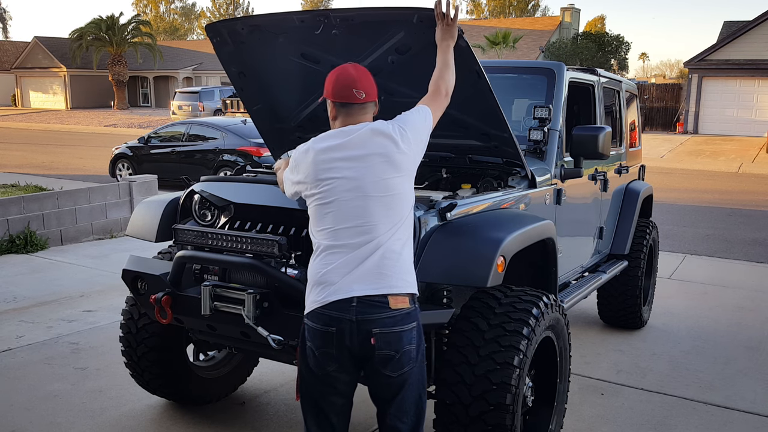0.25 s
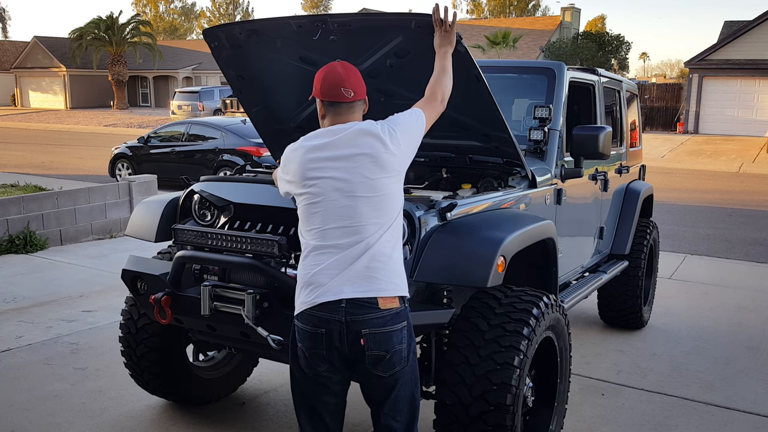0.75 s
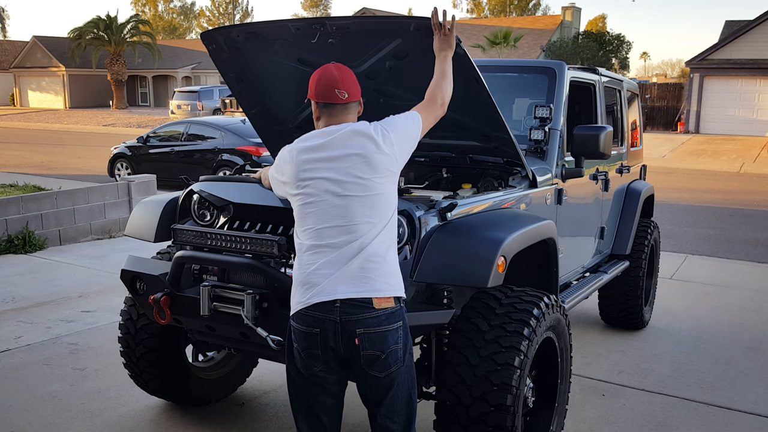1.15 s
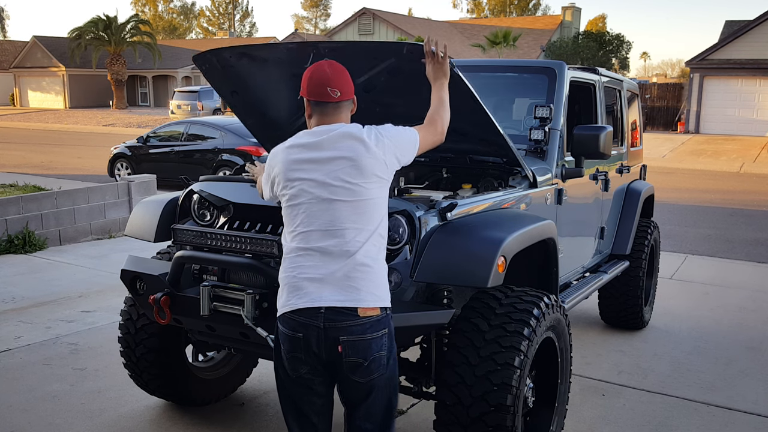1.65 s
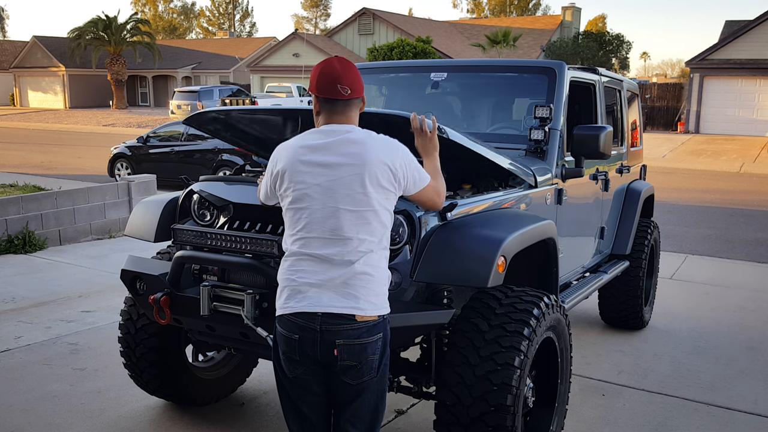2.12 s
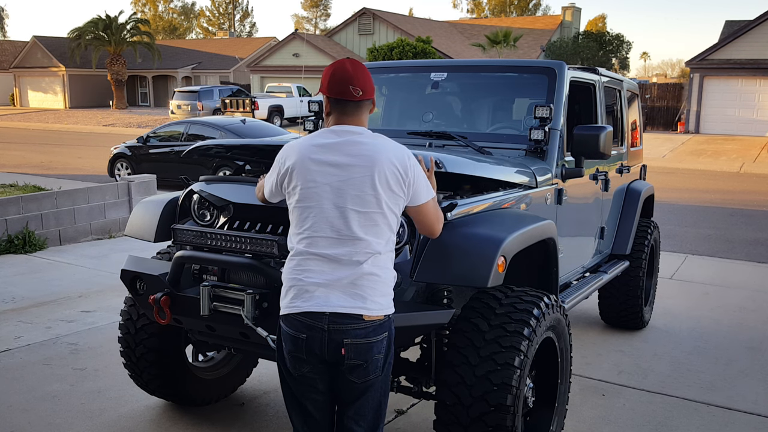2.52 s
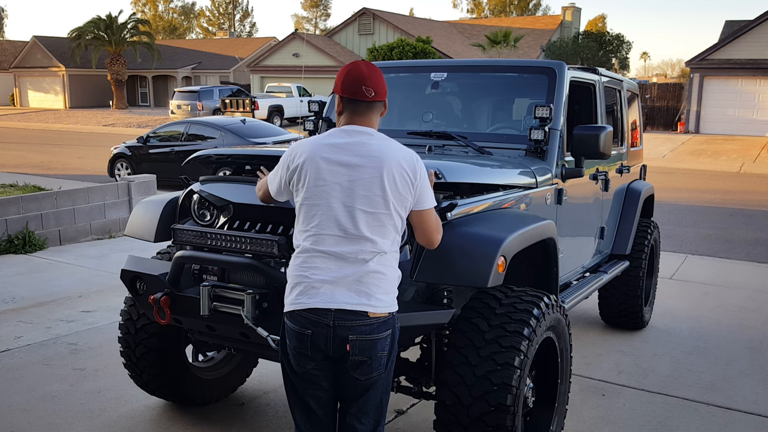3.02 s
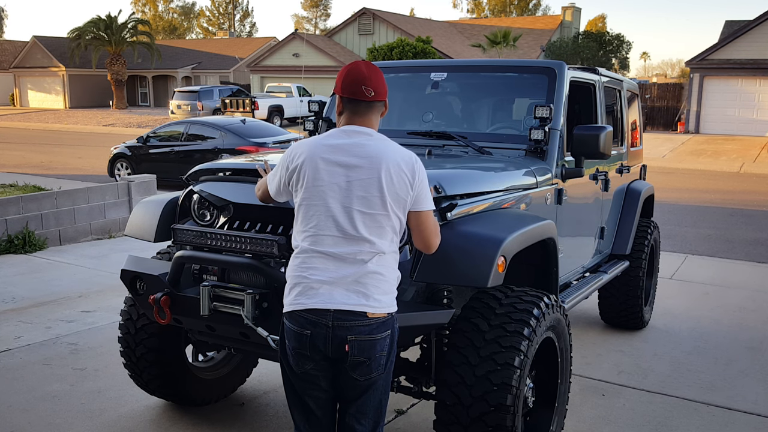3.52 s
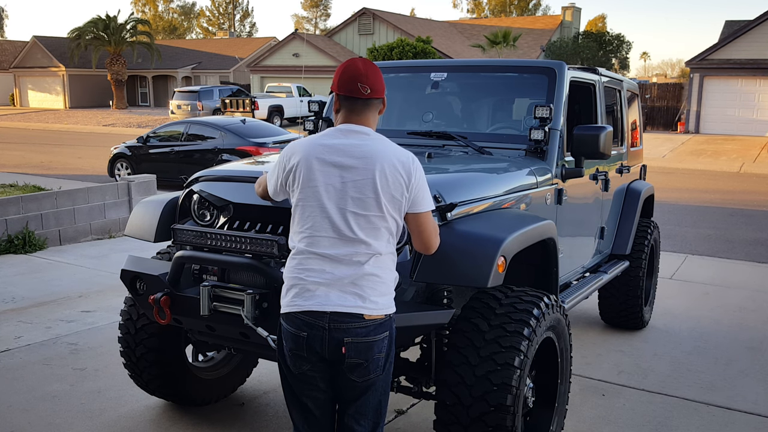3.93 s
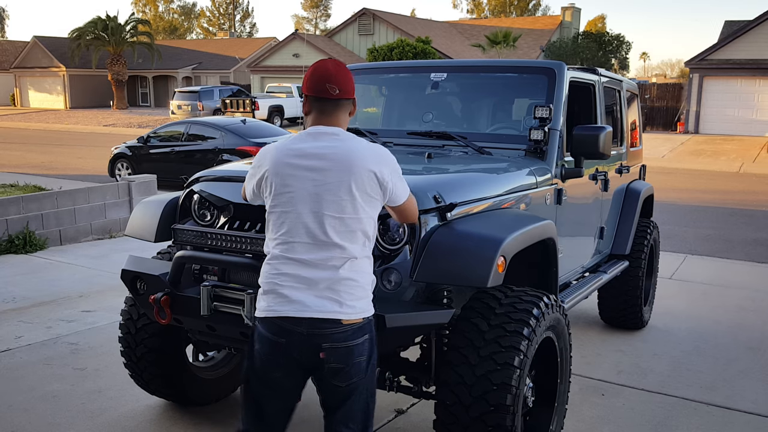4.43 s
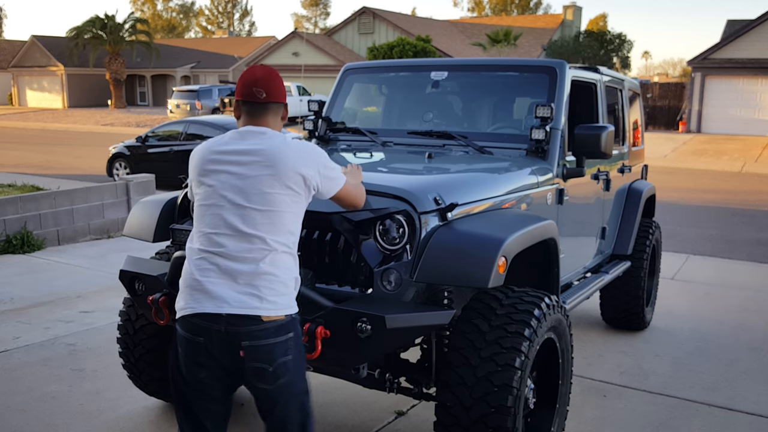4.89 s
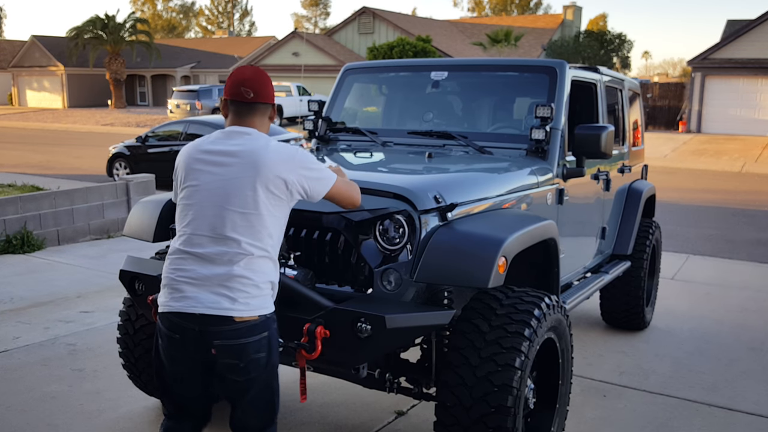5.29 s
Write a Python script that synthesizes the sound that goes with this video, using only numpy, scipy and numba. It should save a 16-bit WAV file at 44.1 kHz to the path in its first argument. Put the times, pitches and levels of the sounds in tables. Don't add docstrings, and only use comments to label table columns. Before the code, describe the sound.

In a driveway a few metres from a phone microphone, hands bump softly on car bodywork, then a prop rod snaps loudly into its holder with a quick rattle. After a quieter pause the steel hood lands with a latch clack and a short hollow boom. Faint knocks, gritty shoe scuffs and a small catch click follow over low distant traffic.

```python
import sys
import numpy as np
from scipy import signal
from scipy.fft import rfft, irfft
from scipy.io import wavfile
from scipy.ndimage import uniform_filter1d
from numba import njit

SR = 44100
rng = np.random.default_rng(int(sys.argv[2]) if len(sys.argv) > 2 else 0)


def elevation(decibels):
    levels = np.asarray(decibels, float)
    return 10 ** (levels / 20)


def log_audio(samples):
    frames = np.atleast_2d(samples).T
    limited = np.clip(frames, -1, 1)
    pcm = np.round(limited * 32767).astype(np.int16)
    wavfile.write(sys.argv[1], SR, pcm)


N = 244843

# start in seconds, strength in dB, contact brightness in Hz,
# chatter length in seconds.
HOOD_BLOWS = [
    (3.575, -56, 700, 0.024),
    (3.623, -42, 930, 0.0098),
    (3.64, -44, 600, 0.0028),
]
LATCH_BLOWS = [
    (3.57, -43.5, 6200, 0.0036),
    (3.573, -39.5, 5000, 0.0017),
    (3.625, -45, 3500, 0.0025),
    (3.636, -51, 2500, 0.0036),
    (3.706, -64, 6000, .012),
]
ROD_BLOWS = [
    (1.369, -57, 6000, 0.002),
    (1.372, -28.5, 4000, .003),
    (1.3755, -31.5, 4000, 0.0042),
    (1.3825, -34.5, 1980, 0.0017),
]
CATCH_BLOWS = [
    (5.091, -52.5, 2500, 0.0023),
    (5.128, -61.5, 7000, 0.022),
]
# frequency in Hz, level in dB, t60 in seconds.
HOOD_MODES = [(51.7, -25, .6), (112, -14.5, 0.47), (154, -9.5, 0.26), (218, -2.5, 0.17), (265.8, -1, 0.28),
              (359, -6.5, 0.16), (440.1, 1.5, 0.25), (573, 7.5, 0.038), (654, -6, 0.079), (868, 2, 0.057),
              (1003, -7.5, 0.095)]
LATCH_MODES = [(295, -5.5, 0.3), (554, 5, 0.15), (708, -5.5, 0.11), (1180, -8, 0.059), (1297, -4, 0.06),
               (1920, -6, 0.057), (2080, -0.5, 0.025), (3090, -6.5, 0.035), (4230, -14.5, .05),
               (5380, -6.5, 0.049)]
ROD_MODES = [(155.8, 2.5, 0.13), (267.7, -4.5, 0.12), (359, -1, 0.083), (450.4, -2, 0.12), (563, -4, 0.036),
             (648, -4.5, 0.039), (1010, -3.5, 0.056), (1336, -15, .1), (1446, -11.5, 0.055),
             (1545, 2.5, 0.035), (1860, -3, 0.086), (1838, -7, 0.086), (2147, 1, .06), (2330, -13, 0.091),
             (2380, -25, .08), (3000, -5.5, 0.047), (4640, -11.5, 0.035), (8000, -13, 0.052)]
CATCH_MODES = [(267, 1.5, 0.035), (827, -14, 0.077), (1097, -2.5, 0.072), (1262, -2, 0.11),
               (1550, 3.5, 0.024), (1864, -8, 0.072), (2140, -14, .08)]
# frequency in Hz, density in dB per Hz.
HOOD_SHEET = [(30, -24), (60, -18.5), (110, -19), (200, -19), (330, 0.5), (600, -4), (1000, -15.5),
              (2000, -15.5), (4000, -18.5), (16000, -47)]
LATCH_SHEET = [(100, -24), (300, -19), (650, 0.5), (950, -12), (1300, -9), (2100, -11), (3000, -16),
               (4700, -14), (5050, -14.5), (5400, -18), (8300, -14), (16000, -21.5)]
ROD_SHEET = [(60, -38), (100, -12.5), (160, -1.5), (300, -6), (600, -4), (1100, -9), (1900, -8), (2600, -7),
             (4700, -13), (5200, -16), (5700, -11.5), (8300, -10), (16000, -17.5)]
CATCH_SHEET = [(100, -23), (230, -11), (600, -7), (1300, -10), (2200, -8.5), (3500, -17.5), (8300, -11),
               (16000, -19.5)]
# frequency in Hz, t60 in seconds.
SHEET_T60 = [(60, 1), (200, 0.32), (1000, 0.28), (3000, 0.26), (8000, 0.17), (16000, 0.1336)]
# start in seconds, peak in dB, centre in Hz, t60 in seconds.
KNOCKS = [(0.517, -63, 516, 0.064), (0.608, -48, 238, 0.12), (0.608, -52, 805, 0.1),
          (0.678, -53.5, 316, 0.11), (0.747, -52, 522, 0.055), (0.756, -45.5, 502, 0.11),
          (0.837, -43, 596, 0.05), (0.844, -40.5, 616, 0.088), (0.869, -51, 300, 0.083),
          (0.946, -49, 800, 0.081), (1.204, -61, 446, 0.07), (1.259, -54, 700, 0.071),
          (1.267, -50, 612, 0.1), (1.738, -49, 319, 0.06), (1.755, -55.5, 1004, 0.22),
          (2.916, -50.5, 401, 0.11), (4.129, -54.5, 695, 0.084), (4.308, -54.5, 474, 0.23),
          (4.543, -50.5, 926, 0.14), (4.655, -50, 624, 0.057), (5.054, -59.5, 323, 0.14),
          (5.301, -53.5, 1000, 0.13), (5.318, -49, 523, 0.13), (5.352, -52.5, 330, 0.096)]
# start in seconds, peak in dB, centre in Hz, t60 in seconds.
TICKS = [(0.1565, -55, 1574, 0.23), (0.7485, -58, 2095, 0.21), (0.843, -54, 1520, 0.069),
         (0.9457, -54.5, 2440, 0.15), (2.9176, -56.5, 1940, 0.043), (2.9297, -58, 1496, 0.12),
         (3.2054, -54, 2366, 0.15), (3.4147, -58.5, 2010, 0.068), (4.5916, -54.5, 2350, 0.15),
         (4.956, -61, 1740, 0.08), (5.069, -56, 4200, .12), (5.2594, -59, 1880, 0.1),
         (5.4094, -61.5, 4000, 0.1)]
# start in seconds, peak in dB, centre in Hz, t60 in seconds.
CLINKS = [
    (.633, -52, 895, 0.17),
    (1.682, -57.5, 2530, .08),
    (5.07, -53, 2140, 0.23),
]
# start in seconds, peak in dB, centre in Hz.
GRIT = [(0.838, -58, 5400), (0.9494, -63, 8560), (1.54, -56, 5860), (1.577, -57.5, 5940),
        (1.6846, -59, 8560), (3.2036, -53, 7220), (4.311, -63, 7020), (4.462, -62.5, 6850),
        (4.593, -54.5, 6630), (4.6124, -52.5, 7700), (4.8604, -59.5, 6560), (5.27, -61, 7500),
        (5.404, -57, 9000)]
# loudest moment in seconds, level in dB, length in seconds.
SCUFFS = [(0.244, -69, 0.35), (0.97, -67.5, .22), (1.6, -74, .15), (1.784, -65, 0.11), (3.22, -70, .2),
          (3.432, -69.5, 0.13), (3.82, -70.5, 0.27), (4.135, -74, 0.27), (4.4, -72.5, .25),
          (4.617, -66.5, .17), (4.89, -69.5, 0.19), (5.215, -67.5, 0.29), (5.55, -76, .2)]
# frequency in Hz, density in dB per Hz.
SCUFF_SPECTRUM = [(400, -14), (1200, -1.5), (3000, -4.5), (8000, -21.5), (10000, -17), (16000, -28)]
# frequency in Hz,
# density in dB per Hz.
TOWN_SPECTRUM = [(30, -16), (50, 0), (79, -3), (120, 2), (200, -2.5), (310, -8), (630, -8.5), (1000, -16),
                 (2000, -26.5), (4000, -37.5), (8600, -34), (9400, -30.5), (12500, -37), (15600, -35)]
# frequency in Hz, left-right correlation from 0 to 1.
LIKENESS = [(30, 0.96), (125, 0.96), (250, 0.89), (500, 0.58), (1000, 0.13), (4000, 0.034), (16000, .05)]
# frequency in Hz, left minus right in dB.
SHADE = [(60, 1.5), (300, 0.5), (700, 3.5), (1290, 4), (2380, 4), (4400, -1.3), (8120, 5.5), (15000, 3.8)]
# frequency in Hz, gain in dB.
PORT = [(8600, 1), (9500, -8.5), (12000, -1.5), (15500, 3)]

HOOD_RATTLE = dict(s=3.685, gap_s=.021, growth=1.03, db=-49.5, loss_db=3.5, bright_hz=647, length_s=0.0056)
LATCH_RATTLE = dict(s=3.579, gap_s=.008, growth=1.12, db=-47.5, loss_db=0.5, bright_hz=2800, length_s=.005)
ROD_RATTLE = dict(s=1.397, gap_s=.011, growth=1.24, db=-46.5, loss_db=2.5, bright_hz=2600, length_s=0.0055)
CATCH_RATTLE = dict(s=5.096, gap_s=.005, growth=1.05, db=-51.5, loss_db=1, bright_hz=2500, length_s=0.0048)
DRUM_S, DRUM_HZ, DRUM_DB, DRUM_SAG_HZ_PER_S = 3.636, 321.6, -28.5, 160
DRUM_ATTACK_S, DRUM_HOLD_S, DRUM_T60_S = .008, 0.035, 0.079
GRIT_T60_S = 0.029
SCUFF_REST_DB = -76.5
YARD_T60_S, YARD_DB, YARD_GAP_S, YARD_HZ = 0.48, -13.5, 0.01573, 4000
TOWN_DB, TOWN_SWELL_DB, TOWN_RISE_DB_PER_S, TOWN_RISE_FROM_S = -59.5, 1.94, 0.87, 3.64
AIR_PAN_DB = 1.2
OCTAVES_HZ = 31.25 * 2 ** np.arange(10)
TOP_HZ, EDGE_HZ, OFFSET = 15740, 16400, -.0005


def hood():
    blows = HOOD_BLOWS + rebounds(**HOOD_RATTLE, count=5)
    return part(blows, HOOD_MODES, HOOD_SHEET, sheet_db=10.5, t60_scale=1.08)


def drum():
    t = np.clip(np.arange(N) / SR - DRUM_S, 0, None)
    note = np.sin(2 * np.pi * (DRUM_HZ - DRUM_SAG_HZ_PER_S * t / 2) * t)
    attack = np.clip(t / DRUM_ATTACK_S, 0, 1)
    decay = 1000 ** (-np.clip(t - DRUM_HOLD_S, 0, None) / DRUM_T60_S)
    return np.sqrt(2) * elevation(DRUM_DB) * note * attack * decay * np.ones((2, 1))


def latch():
    blows = LATCH_BLOWS + rebounds(**LATCH_RATTLE, count=4)
    return part(blows, LATCH_MODES, LATCH_SHEET, sheet_db=6.5, t60_scale=0.81)


def prop_rod():
    blows = ROD_BLOWS + rebounds(**ROD_RATTLE, count=6)
    return part(blows, ROD_MODES, ROD_SHEET, sheet_db=3.5, t60_scale=1.036)


def side_catch():
    blows = CATCH_BLOWS + rebounds(**CATCH_RATTLE, count=4)
    return part(blows, CATCH_MODES, CATCH_SHEET, sheet_db=6.0, t60_scale=0.83)


def part(blows, modes, sheet, sheet_db, t60_scale, size=32768):
    hz, db, t60 = np.transpose(modes)
    strong = heard(hz, elevation(db), t60, at(SHADE, hz), size)
    t = np.arange(size) / SR
    force, power = np.zeros(size), np.zeros((len(OCTAVES_HZ), size))
    first_s = blows[0][0]
    for s, blow_db, bright_hz, length_s in blows:
        add(force, s - first_s, elevation(blow_db) * chatter(bright_hz, length_s))
        push = unit(np.exp(-t[:4096] / length_s)) ** 2
        softness = 1 + (OCTAVES_HZ[:, None] / bright_hz) ** 2
        add(power, s - first_s, elevation(2 * blow_db) * push / softness)
    keep = 1000 ** (-2 / (t60_scale * at(SHEET_T60, OCTAVES_HZ) * SR))
    energy = np.array([signal.lfilter([1], [1, -k], p) for k, p in zip(keep, power)])

    def sheet_spectrum(f):
        return below_top(sheet, f) + np.outer([.5, -.5], at(SHADE, f))

    roar = octaves_of(sheet_spectrum, size, grain_db=4.5)
    roar = np.sum(roar * np.sqrt(energy)[:, None], axis=0)
    strong = strong / strong[:, :512].std()
    rung = signal.fftconvolve(force[None], strong, axes=1)[:, :size]
    out = np.zeros((2, N))
    add(out, first_s, rung + elevation(sheet_db) * roar)
    return out


def rebounds(s, gap_s, growth, db, loss_db, bright_hz, length_s, count):
    gaps = gap_s * growth ** np.arange(count)
    times = s + np.cumsum(gaps) - gaps
    return [(t, db - loss_db * k, bright_hz, length_s) for k, t in enumerate(times)]


def chatter(bright_hz, length_s):
    t = np.arange(2048) / SR
    spikes = rng.standard_normal(2048) * elevation(2.7 * rng.standard_normal(2048))
    force = (t == 0) + 0.59 * unit(spikes * np.exp(-t / length_s))
    return unit(signal.lfilter(*signal.butter(1, bright_hz, fs=SR), force))


def heard(hz, gain, t60, pan_db, size):
    turn = .5 * np.arccos(at(LIKENESS, hz)) * rng.uniform(-1.4, 1, len(hz))
    start = gain * rng.choice([-1, 1], len(hz))
    left = start * elevation(pan_db / 2) * np.exp(1j * turn)
    right = start * elevation(-pan_db / 2) * np.exp(-1j * turn)
    return ring(hz, left, right, t60, size)


@njit
def ring(hz, left, right, t60, size):
    out = np.zeros((2, size))
    for k in range(len(hz)):
        z = 1 + 0j
        step = np.exp((2j * np.pi * hz[k] - np.log(1000) / t60[k]) / SR)
        for i in range(size):
            out[0, i] += (left[k] * z).imag
            out[1, i] += (right[k] * z).imag
            z *= step
    return out


def light_touches():
    grit = [row + (GRIT_T60_S,) for row in GRIT]
    out = taps(KNOCKS, length_s=0.0024, pan_db=3.5, narrow_db=12)
    out = out + taps(TICKS, length_s=0.0012, pan_db=4, narrow_db=9)
    out = out + taps(CLINKS, length_s=0.0011, pan_db=3.0, narrow_db=25.5)
    return out + taps(grit, length_s=0.00066, pan_db=2.6, narrow_db=9.5)


def taps(events, length_s, pan_db, narrow_db, count=6, size=8192):
    out, t = np.zeros((2, N)), np.arange(size) / SR
    for s, db, hz, t60 in events:
        mode_hz = hz * 2 ** (2.57 / narrow_db * rng.uniform(-1.028, 1, count))
        body = heard(mode_hz, np.ones(count), np.full(count, t60), pan_db, size)
        rung = signal.fftconvolve(chatter(8100, length_s)[None], body, axes=1)[:, :size]
        scuff = octaves_of(lambda f: -narrow_db * np.abs(np.log2(f / hz)), size, grain_db=6.0).sum(axis=0)
        scuff = scuff * panned(pan_db) * (1 - np.exp(-t / length_s)) * 1000 ** (-t / t60)
        x = unit(scuff) + 0.92 * unit(rung)
        add(out, s, elevation(db) * x / np.abs(x.mean(axis=0)).max())
    return out


def cloth_and_shoes():
    t = np.arange(N) / SR
    power = elevation(2 * SCUFF_REST_DB)
    for s, db, length_s in SCUFFS:
        power = power + elevation(2 * db) * np.exp(-np.abs(t - s) / (.3 * length_s))
    return bands(SCUFF_SPECTRUM, 3, 25, 3) * np.sqrt(power) * panned(AIR_PAN_DB)


def yard(x, size=16384):
    t = np.arange(size) / SR
    echo = octaves_of(lambda f: -10 * np.log10(1 + (f / YARD_HZ) ** 2), size, grain_db=2.0).sum(axis=0)
    echo = echo * 1000 ** (-t / YARD_T60_S) * (t > YARD_GAP_S)
    return signal.fftconvolve(x.mean(axis=0)[None], elevation(YARD_DB) * unit(echo), axes=1)[:, :N]


def traffic():
    t = np.arange(N) / SR
    rise_db = TOWN_RISE_DB_PER_S * np.clip(t - TOWN_RISE_FROM_S, 0, None)
    level_db = TOWN_DB + TOWN_SWELL_DB * walk(3.22) + rise_db
    return bands(TOWN_SPECTRUM, 0.59, 5.0, 0) * elevation(level_db) * panned(AIR_PAN_DB)


def bands(table, flicker_db, rate_hz, grain_db):
    layers = octaves_of(lambda f: below_top(table, f), N, grain_db)
    out = sum(layer * elevation(flicker_db * walk(rate_hz)) for layer in layers)
    return out / out.std()


def walk(rate_hz):
    k = int(SR / rate_hz)
    held = np.repeat(rng.standard_normal(N // k + 1), k)
    return uniform_filter1d(uniform_filter1d(held, k), k)[:N]


def octaves_of(db_of_hz, size, grain_db):
    f = np.fft.rfftfreq(size, 1 / SR) + 1
    like = at(LIKENESS, f)
    mid, side = (rfft(rng.standard_normal(size) * elevation(grain_db * rng.standard_normal(size))) for _ in range(2))
    mid, side = mid * np.sqrt(1 + like), side * np.sqrt(1 - like)
    pair = np.array([mid + side, mid - side]) * elevation(db_of_hz(f))
    gates = [np.cos(np.pi / 2 * np.clip(np.log2(f / hz), -1, 1)) ** 2 for hz in OCTAVES_HZ]
    layers = np.array([irfft(pair * gate, size) for gate in gates])
    return layers / layers.sum(axis=0).std()


def at(table, hz):
    table = np.array(table)
    return np.interp(np.log(hz), np.log(table[:, 0]), table[:, 1])


def below_top(table, hz):
    return np.where(hz < TOP_HZ, at(table, hz), -200)


def panned(pan_db):
    return elevation([[pan_db / 2], [-pan_db / 2]])


def unit(x):
    return x / np.sqrt(np.sum(x ** 2) + 1e-18)


def add(out, s, x):
    i = int(s * SR)
    out[..., i:i + x.shape[-1]] += x[..., :out.shape[-1] - i]


def scene():
    small = latch() + prop_rod() + side_catch() + light_touches()
    small = signal.sosfilt(signal.butter(3, 125, "high", fs=SR, output="sos"), small)
    near = hood() + drum() + small
    return near + yard(near) + cloth_and_shoes() + traffic()


def low_pass(x):
    return signal.sosfilt(signal.butter(12, 16470, fs=SR, output="sos"), x)


def record(dry):
    f = np.fft.rfftfreq(N, 1 / SR) + 1
    port = irfft(rfft(dry) * elevation(at(PORT, f)) * (f < EDGE_HZ), N)
    mix = signal.lfilter(*signal.butter(1, 35, "high", fs=SR), port) + OFFSET
    return low_pass(mix)


dry = scene()
out = record(dry)
log_audio(out)
```